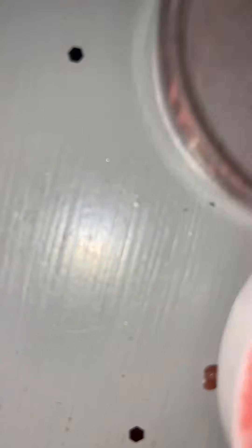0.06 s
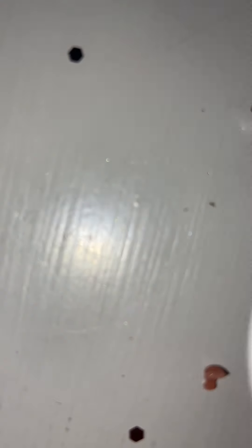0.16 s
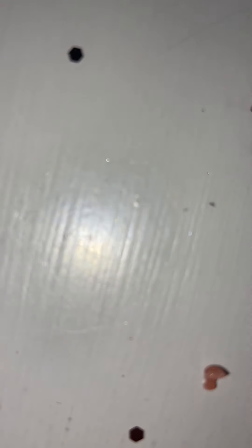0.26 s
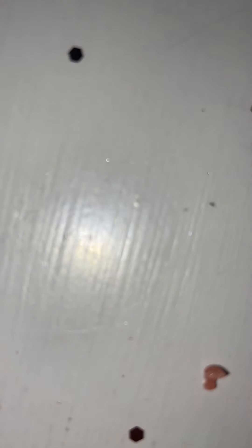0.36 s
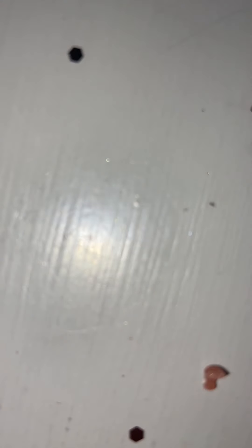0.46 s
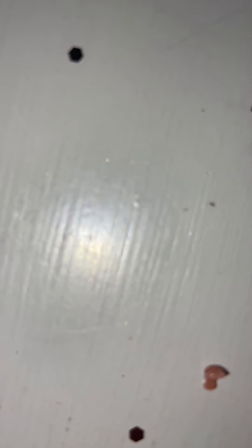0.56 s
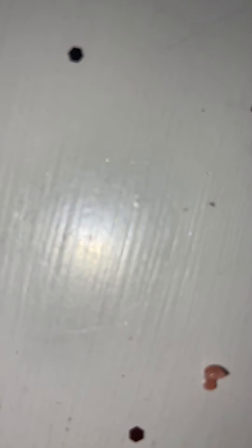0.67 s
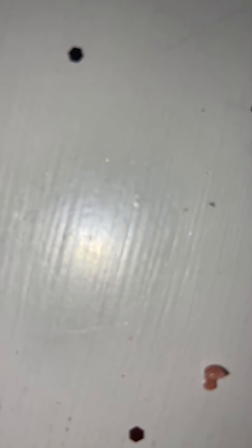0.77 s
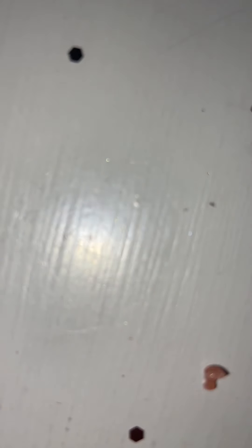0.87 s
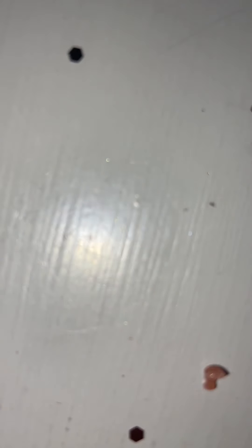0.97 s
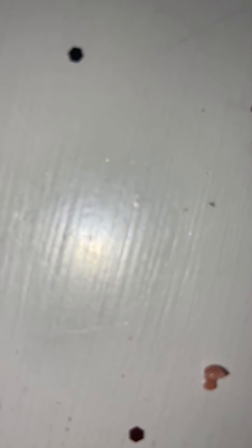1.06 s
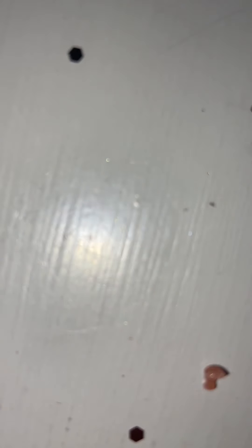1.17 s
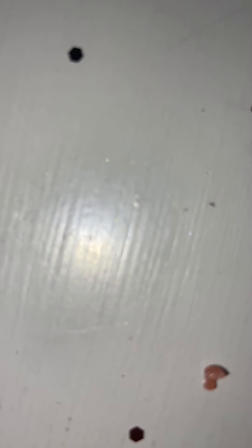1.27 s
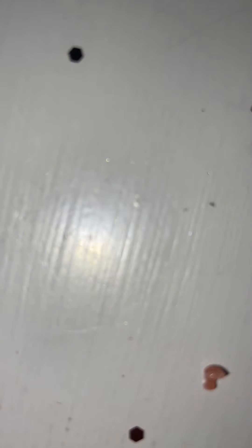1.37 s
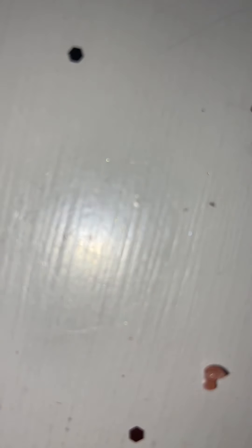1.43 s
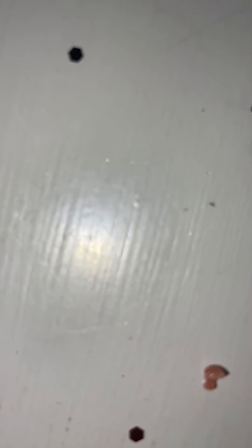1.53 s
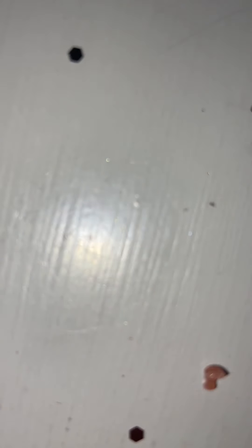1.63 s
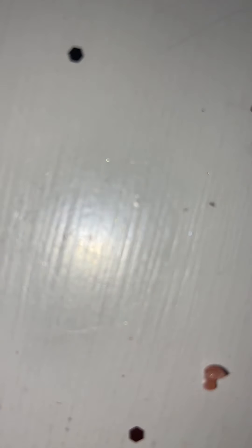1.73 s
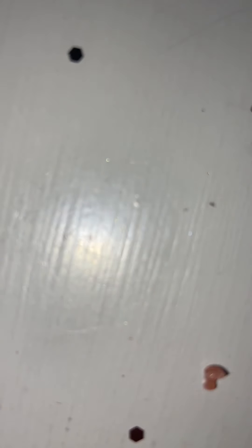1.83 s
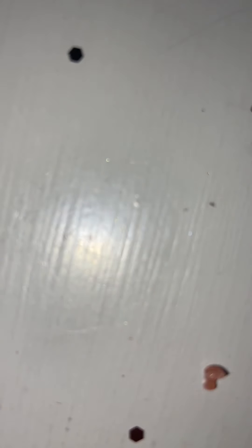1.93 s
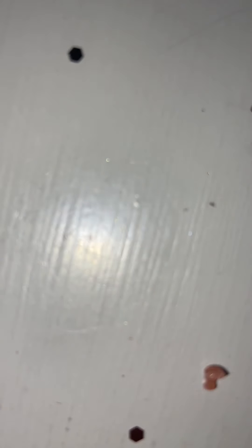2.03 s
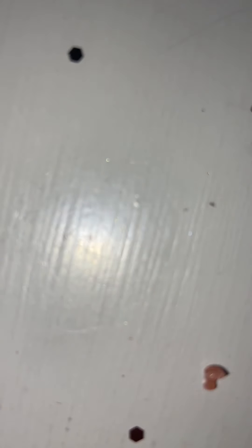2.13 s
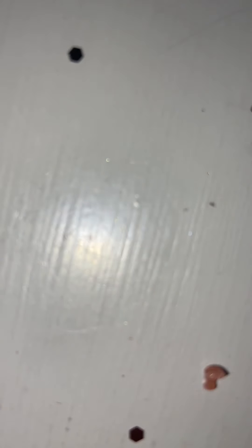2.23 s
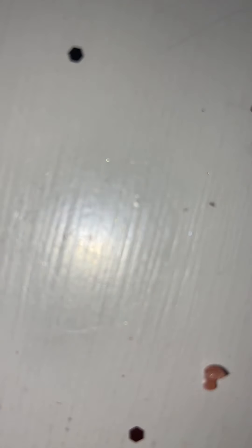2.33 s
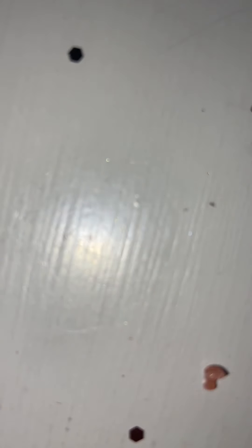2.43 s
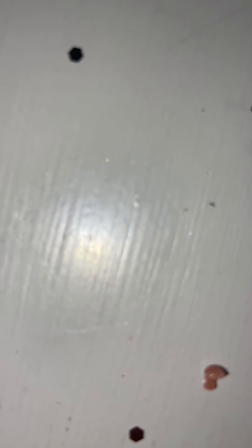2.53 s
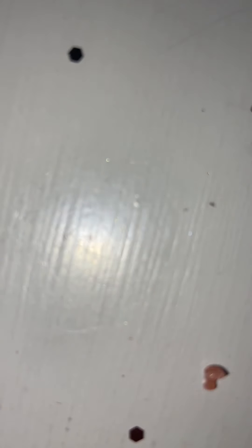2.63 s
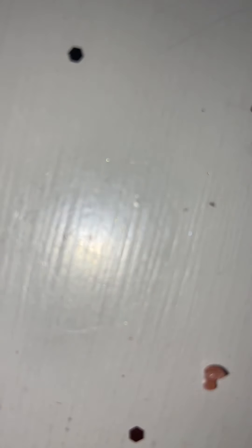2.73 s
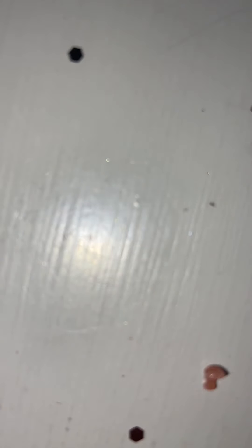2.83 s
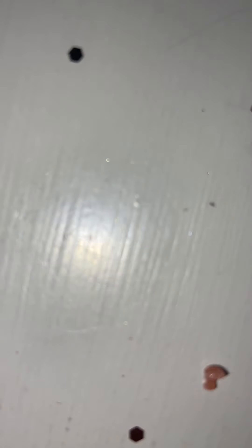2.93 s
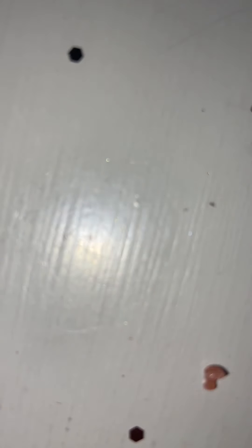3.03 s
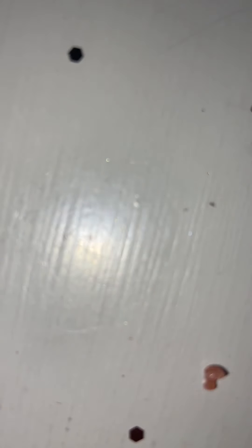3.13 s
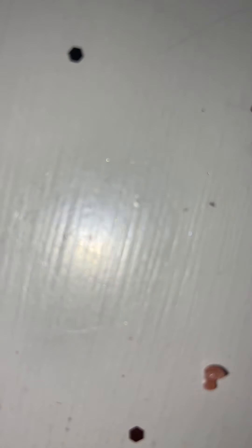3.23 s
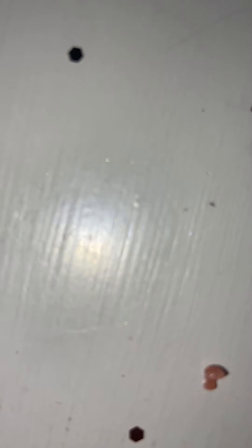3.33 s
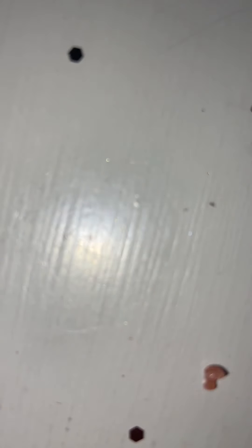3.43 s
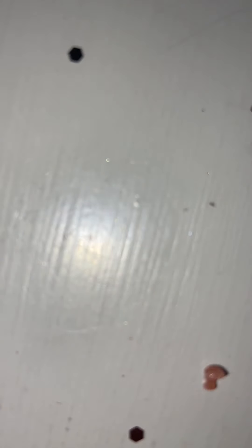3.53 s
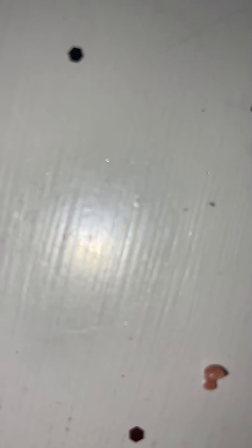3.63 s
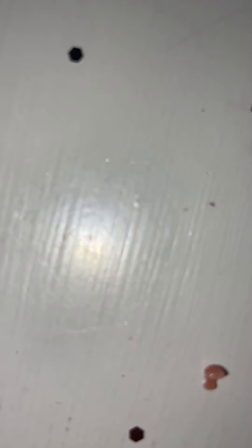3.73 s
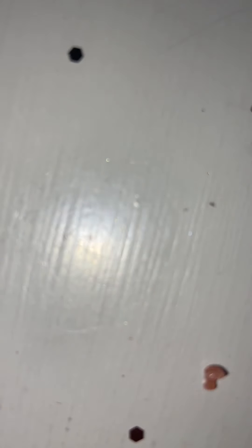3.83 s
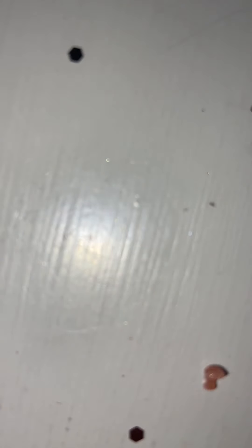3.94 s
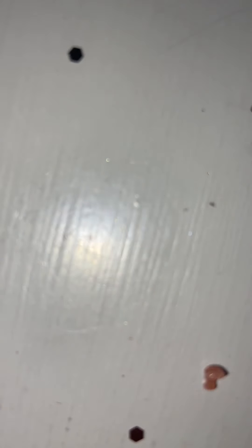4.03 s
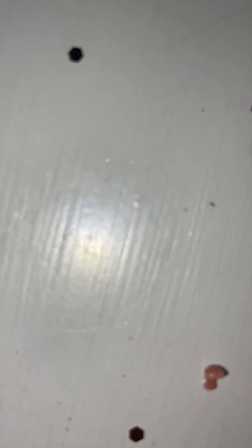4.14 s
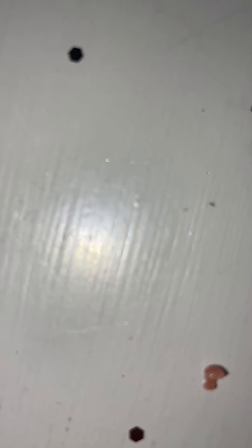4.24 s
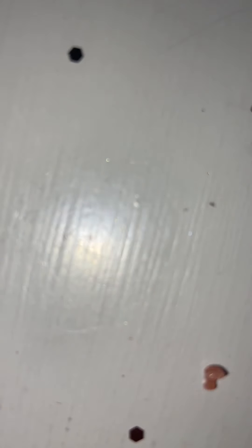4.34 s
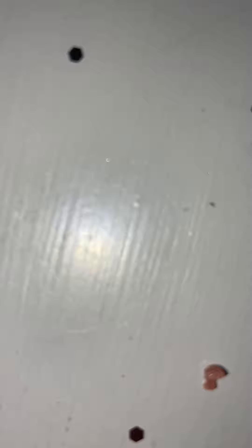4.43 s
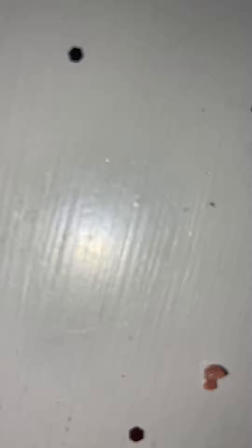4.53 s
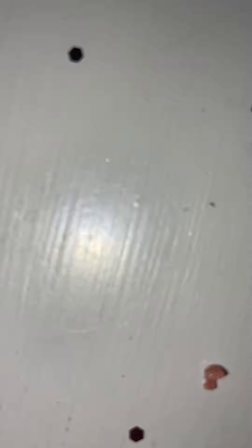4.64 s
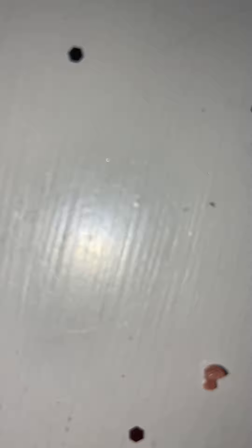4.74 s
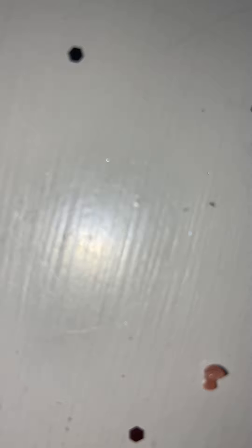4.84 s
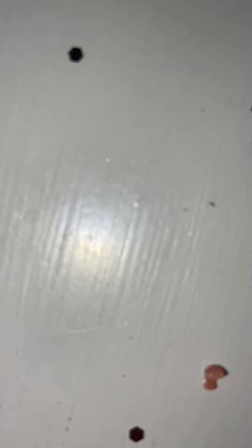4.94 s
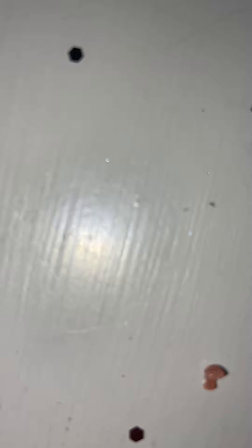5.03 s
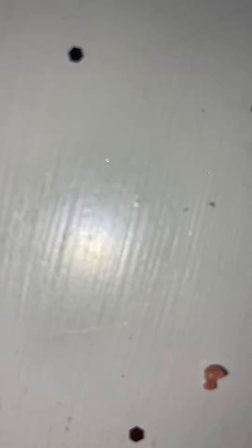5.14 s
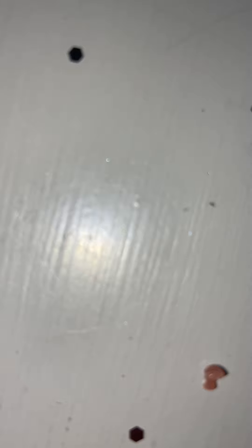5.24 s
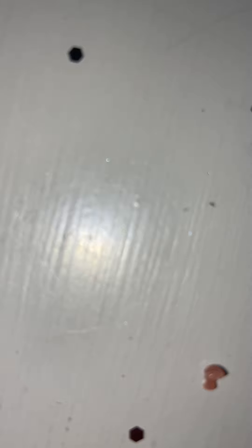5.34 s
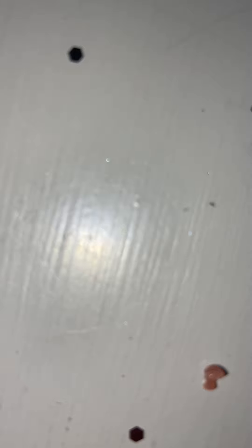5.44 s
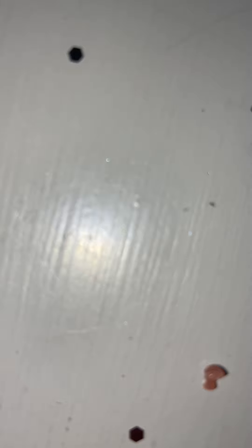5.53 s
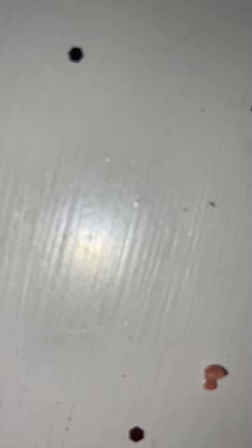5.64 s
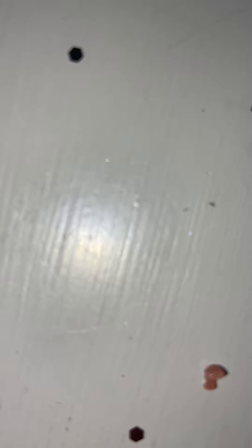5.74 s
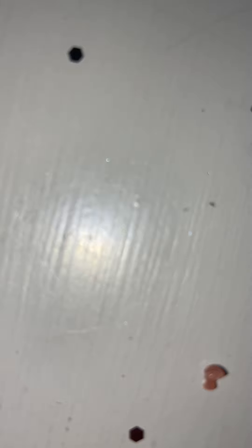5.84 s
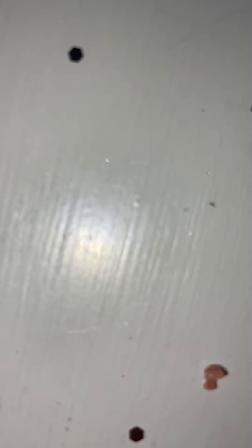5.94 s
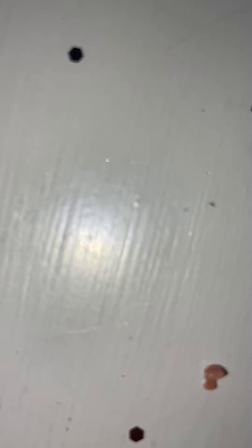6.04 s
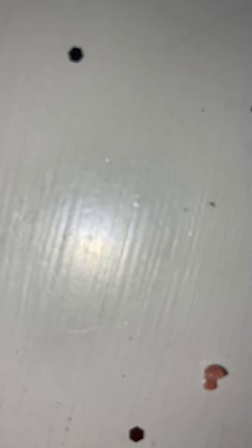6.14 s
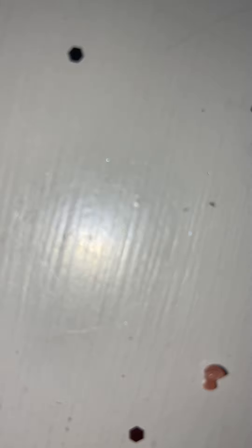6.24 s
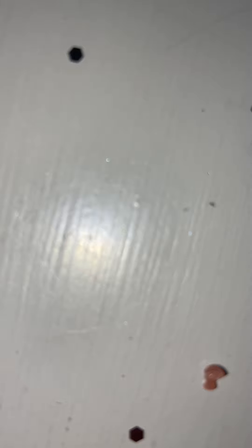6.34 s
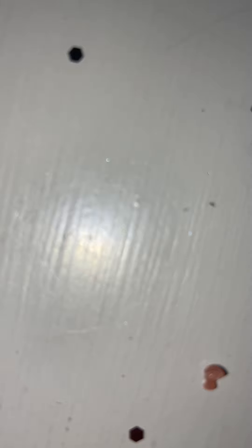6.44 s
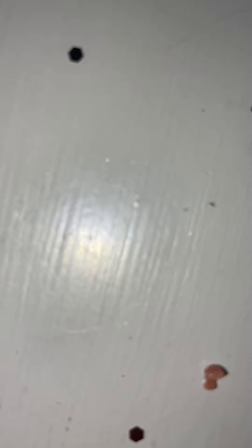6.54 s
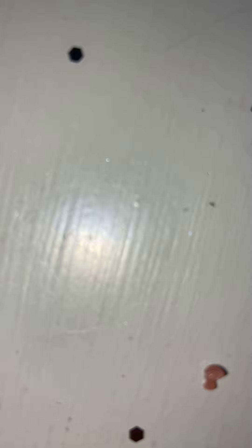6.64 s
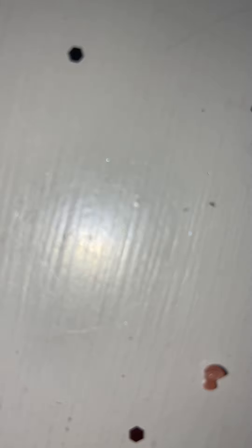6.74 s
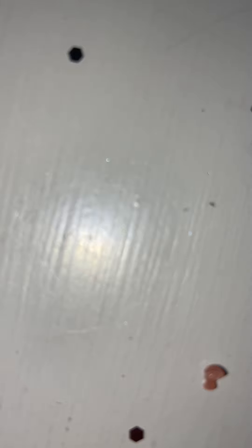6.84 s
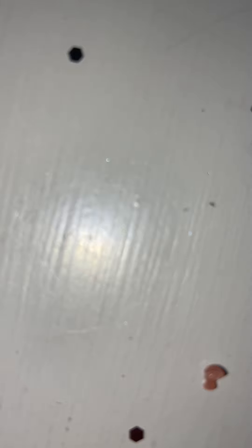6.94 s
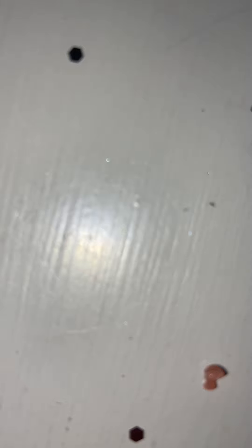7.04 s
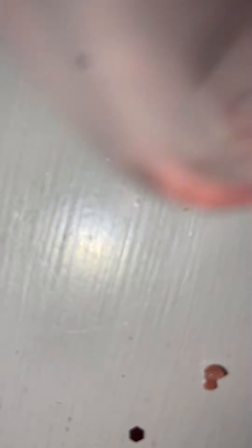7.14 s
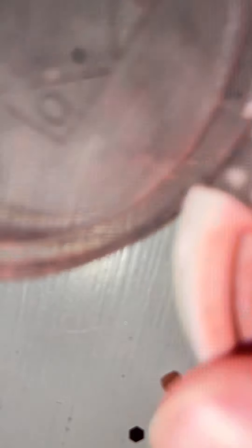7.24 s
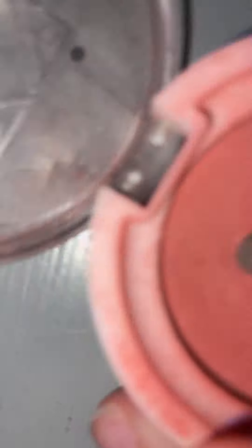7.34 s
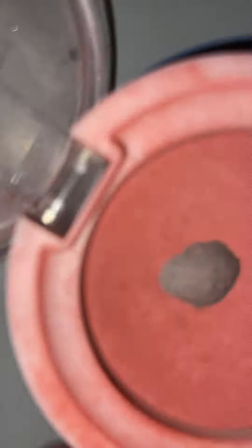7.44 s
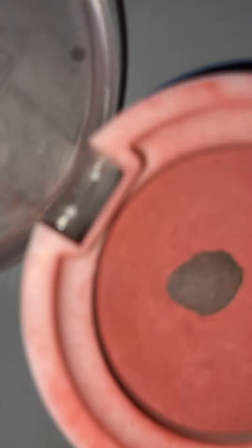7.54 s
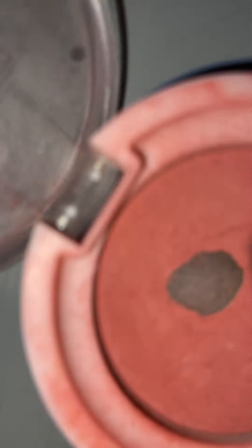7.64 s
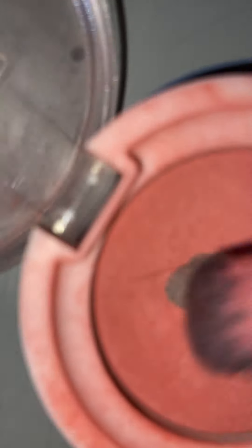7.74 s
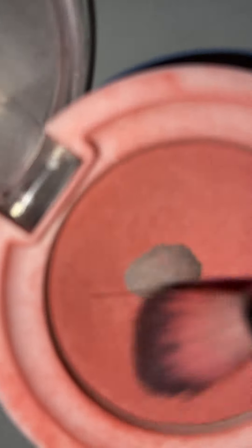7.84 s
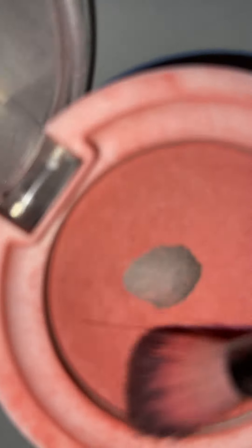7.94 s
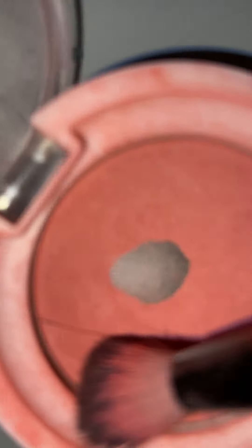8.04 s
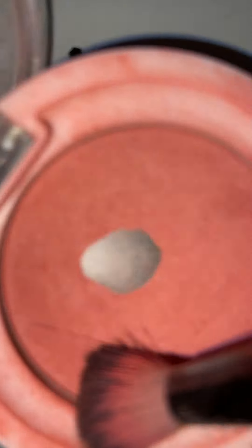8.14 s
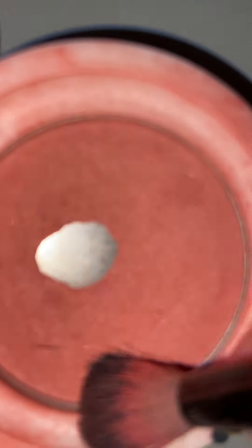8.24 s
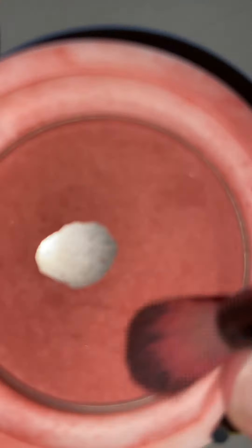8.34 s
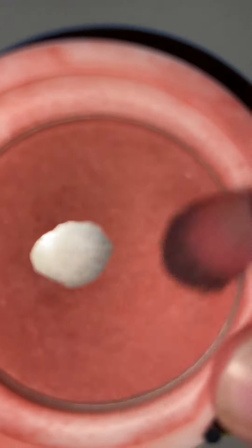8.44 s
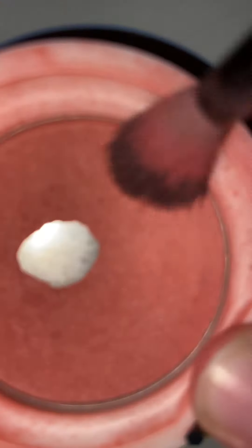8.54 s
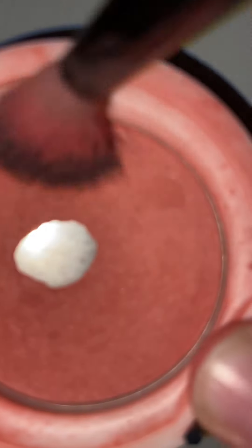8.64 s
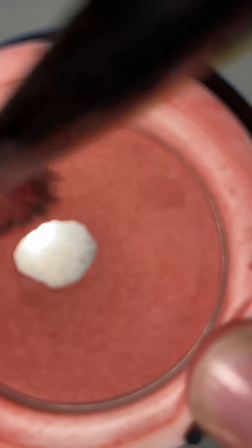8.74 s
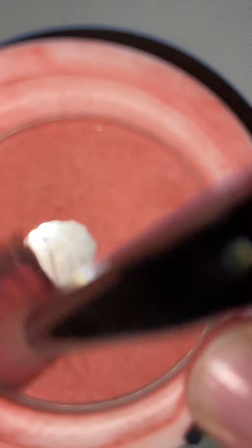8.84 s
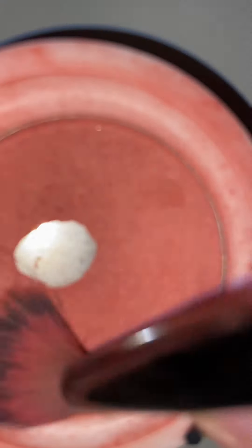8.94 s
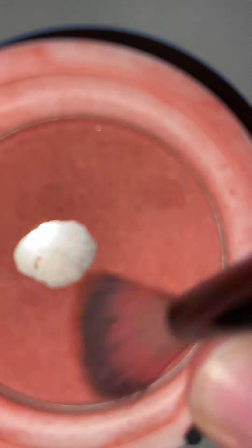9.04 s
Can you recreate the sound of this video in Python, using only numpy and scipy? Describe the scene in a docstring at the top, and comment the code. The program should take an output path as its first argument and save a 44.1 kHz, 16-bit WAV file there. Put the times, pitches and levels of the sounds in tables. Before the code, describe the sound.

Sharp plastic knock and slide, a dull hand thump, faint handle taps and scuffs, then a loud compact clatter and short scratchy brush strokes.

```python
"""A plastic makeup compact is pushed away over a table and later set down with a clatter: blows, ticks and
uneven slips excite the decaying modes of lid, shell, hollow and table. A brush is picked up with light taps
and later scratches over pressed powder, as coloured grit. A hand thumps the table, fingers scuff, a hinge
squeaks and a sleeve rustles. Behind is the quiet, low noise of a small room; a phone's two ports pick it up.
"""
import sys
import numpy as np
from scipy import signal
from scipy.fft import rfft, irfft, next_fast_len
from scipy.io import wavfile
from scipy.ndimage import map_coordinates

SR = 44100
rng = np.random.default_rng(int(sys.argv[2]) if len(sys.argv) > 2 else 0)


def unload_wav(signal):
    """Save mono or channel-first audio to the path in sys.argv[1] as 16-bit WAV at rate SR, clipped to [-1, 1]."""
    wavfile.write(
        sys.argv[1],
        SR,
        np.round(np.clip(np.atleast_2d(signal).T, -1, 1) * 32767).astype(np.int16),
    )


N = 400869
TIME_S = np.arange(N) / SR
BLOW_TIME_S = np.arange(SR // 4) / SR  # the life of one blow

# Modes of the table, its slap, the shell, the hollow and the rim. Each row: frequency in Hz, level in dB, t60 in s.
TABLE_MODES = [(295, -4.5, .08), (352, -0.5, 0.062), (424, -3, 0.034)]
SLAP_MODES = [(325.4, 7.5, 0.029), (403.3, 3.5, .07), (520, -5, 0.087), (687.8, -21, 0.036),
              (740, -4.5, 0.067), (1642.4, -7.5, 0.074)]
SHELL_MODES = [(1163, -2.5, 0.028), (1455, -3, 0.04), (1534, 1, 0.036), (1870, -6.5, .04),
               (2120, -11.5, 0.039), (2380, -8, 0.011), (2550, -6.5, 0.031), (2607, 1, 0.058),
               (3490, -2.5, 0.038), (3580, -7.5, 0.012), (4134, -9, 0.039), (4560, -5.5, 0.0099)]
HOLLOW_MODES = [(763.6, -6, 0.056), (841, 1.5, 0.039), (924, 0.5, 0.042), (1250, -13.5, 0.022)]
RIM_MODES = [(6630, -1.5, 0.0023), (8254, -4.5, 0.035), (9550, -3, .018), (10360, -1, 0.019),
             (10900, -5.5, 0.011), (14770, -5, 0.014)]
# Spectra of the dense modes of table, slap, case, shell, rim and hiss. Each row: frequency in Hz, level in dB per Hz.
TABLE_SPECTRUM = [(25, -46), (50, -23.5), (130, -11), (220, -9.5), (345, 3), (480, -5), (620, -12),
                  (1000, -15), (2200, -41)]
SLAP_SPECTRUM = [(120, -6.5), (400, 9.5), (750, -2), (1150, -10), (1900, -15), (3000, -29), (6000, -43.5),
                 (12000, -53)]
CASE_SPECTRUM = [(400, -18), (620, -11), (850, 4), (1050, 3.5), (1300, -10), (2000, -28)]
SHELL_SPECTRUM = [(500, -28), (1200, 2), (1900, -3.5), (2800, 4.5), (3500, -0.5), (4700, -6.5), (5600, -21),
                  (8000, -33)]
RIM_SPECTRUM = [(2500, -28.5), (5000, -8.5), (6800, -3.5), (10000, 3.5), (13000, -11), (14700, -1),
                (16300, -9.5)]
HISS_SPECTRUM = [(1000, -17.5), (2500, -4), (4300, 2), (6000, -3), (8000, 2), (10300, 1.5), (13000, -5.5),
                 (15000, 2.5), (16300, -5.5)]
# The lid's crowded lower and upper modes. Each row: frequency in Hz, level in dB per Hz.
LID_LOWER_SPECTRUM = [(1900, -30), (2450, -3), (2700, 0), (3050, 1.5), (3300, -15), (3900, -11.5),
                      (5000, -19.5), (7000, -36.5)]
LID_UPPER_SPECTRUM = [(4300, -34), (5250, -2), (5750, -0.5), (6050, -5), (6800, -30)]
# A brief contact. Each row: multiple of its centre frequency, level in dB per Hz.
SNAP_SPECTRUM = [(.3, -19), (.7, -7), (1, -0.5), (1.2, -5.5), (1.5, -25.5), (3, -50.5)]


def amp(db):
    """Decibels to gain."""
    return 10 ** (np.asarray(db) / 20)


def unit(x):
    """Scale to rms 1."""
    return x / np.sqrt(np.mean(x ** 2) + 1e-20)


def along(points, hz):
    """(Hz, value) points read on a log axis."""
    point_hz, value = np.transpose(points)
    return np.interp(np.log(hz + 1), np.log(point_hz + 1), value)


def wobble(knots_per_s):
    """A smooth curve through random knots."""
    knots = rng.standard_normal(int(N * knots_per_s / SR) + 4)
    return map_coordinates(knots, [TIME_S * knots_per_s])


def filtered(x, response):
    """x times a complex response of frequency."""
    n = x.shape[-1]
    padded = next_fast_len(n + SR // 8)
    spectrum = rfft(x, padded) * response(np.fft.rfftfreq(padded, 1 / SR))
    return irfft(spectrum, padded)[..., :n]


def coloured(x, spectrum):
    """x shaped by the given spectrum, at rms 1."""
    return unit(filtered(x, lambda hz: amp(along(spectrum, hz))))


def grit(slips_per_s, spread_db, smooth):
    """Tiny slips of random sign and uneven size over smooth friction noise, at rms 1."""
    happens = rng.random(N) < slips_per_s / SR
    sign = rng.choice([-1, 1], N)
    size = amp(spread_db * np.minimum(rng.standard_normal(N), 2))
    return unit(unit(happens * sign * size) + smooth * rng.standard_normal(N))


def ring(modes, scatter_db=2.0):
    """Damped modes, struck at new strengths and signs each time."""
    hz, db, t60_s = np.transpose(modes)[:, :, None]
    strength = amp(db + scatter_db * rng.standard_normal(hz.shape)) * rng.choice([-1, 1], hz.shape)
    decay = amp(-60 * BLOW_TIME_S / t60_s)
    return unit(np.sum(strength * decay * np.sin(2 * np.pi * hz * BLOW_TIME_S), axis=0))


def blow(modes, spectrum, t60_s, dense_db, contact_s=0.00031):
    """A body's answer: clear modes plus dense ones that die like noise, building up over the contact time."""
    noise = coloured(rng.standard_normal(len(BLOW_TIME_S)), spectrum)
    dense = unit(noise * amp(-60 * BLOW_TIME_S / t60_s))
    onset = 1 - np.exp(-BLOW_TIME_S / contact_s)
    return unit((ring(modes) + amp(dense_db) * dense) * onset)


def snap(hz, t60_s):
    """The dry click of a brief contact: decaying noise in a band around hz."""
    noise = coloured(rng.standard_normal(len(BLOW_TIME_S)), np.multiply(SNAP_SPECTRUM, [hz, 1]))
    return unit(noise * amp(-60 * BLOW_TIME_S / t60_s))


def add(track, start_s, db, sound):
    """Lay in a sound of rms 1; db is its energy as a level over 10 ms."""
    part = track[max(round(start_s * SR), 0):][:len(sound)]
    part += amp(db) * np.sqrt(.01 * SR / len(sound)) * sound[:len(part)]


def shake(track, start_s, thud_db, slap_db):
    """The table after weight lands on it: a slap, then the deep swing of the whole board."""
    # Each row: frequency in Hz, level in dB, t60 in s.
    deep_modes = [(60.38, -3, 0.091), (85.67, -6.5, 0.15), (106, -5.5, 0.17), (160.2, 0.5, 0.11),
                  (256, -7.5, 0.091)]
    # Each row: frequency in Hz, level in dB per Hz.
    deep_spectrum = [(25, -41), (40, -17.5), (60, -1), (170, 10), (300, -11.5), (700, -50)]
    track = track.copy()
    add(track, start_s + 0.003, thud_db, blow(deep_modes, deep_spectrum, t60_s=0.043, dense_db=-2, contact_s=0.0091))
    add(track, start_s, slap_db, blow(SLAP_MODES, SLAP_SPECTRUM, t60_s=0.091, dense_db=-1.5))
    return track


def through_table(x, delay_at_1khz_s=0.001812):
    """Bending waves travel slower the lower they are, and reach the two ports unequally."""
    # The low modes radiate to the left. Each row: frequency in Hz, left minus right in dB.
    lean = [(120, 0.5), (290, 6.5), (450, 4.5), (800, 1)]
    side = np.array([[.5], [-.5]])

    def response(hz):
        dispersion = np.exp(-4j * np.pi * delay_at_1khz_s * np.sqrt(1000 * hz))
        return amp(side * along(lean, hz)) * dispersion
    return filtered(x, response)


def rubbed(strokes, bodies, slips_per_s, spread_db, smooth, ease_db=4):
    """One track per body: uneven slips drive it at its own column of the strokes, easing off toward the end."""
    tracks = []
    for column, body in enumerate(bodies):
        pressure = np.zeros(N)
        for start_s, end_s, *dbs in strokes:
            corners_s = np.maximum.accumulate([start_s, start_s + 0.023, end_s - .015, end_s + 0.0067])
            shape = np.interp(TIME_S, corners_s, [0, amp(ease_db / 2), amp(-ease_db / 2), 0])
            pressure += amp(dbs[column]) * shape
        drive = pressure * grit(slips_per_s, spread_db, smooth)
        tracks.append(signal.fftconvolve(drive, body / np.linalg.norm(body))[:N])
    return tracks


def swells(moves):
    """Gain per sample: each move swells to its peak and dies away along a bell curve; powers add."""
    power = 0
    for peak_s, rise_s, fall_s, db in moves:
        width_s = np.where(TIME_S < peak_s, rise_s, fall_s)
        power = power + (amp(db) * np.exp(-((TIME_S - peak_s) / width_s) ** 2)) ** 2
    return np.sqrt(power)


def swishes(moves, slips_per_s):
    """Swelling moves of fine slips, each gathered in a band around its own pitch."""
    slips = amp(1.5 * wobble(40)) * grit(slips_per_s, spread_db=4, smooth=.6)
    return sum(swells([move]) * coloured(slips, np.multiply(SNAP_SPECTRUM, [hz, 1])) for *move, hz in moves)


def compact():
    """Each blow snaps, cracks the rim, clacks in shell and hollow, rings the lid and knocks the table.

    Hard blows favour the lid, soft ones the table."""
    # Each row: start in s, strength in dB, hardness in dB, shares of lid's edge, shell, hollow and snap in dB,
    # lid pitch in Hz.
    blow_rows = [(.018, -24, 10.5, 19, -7.5, 2, 2, 2921), (0.0354, -32.5, 9, -3.5, -7.5, 5, -1, 2923),
                 (.085, -34, -6, 14, -3, 4.5, -5.5, 2960), (.1618, -44, -6, 9, 2.5, 3.5, -9, 2805),
                 (0.1713, -53, -7, 8, -2, 3, -4, 3022), (0.1785, -46, -9.5, 11, 3, 3, -4.5, 2902),
                 (0.196, -50, -11, 0, 4, 6, -8, 3040), (0.2066, -49.5, -11, 12, 0.5, 6, -12, 2850),
                 (0.2237, -53.5, -15, 0, -2, 5, -8, 2950), (.231, -42.5, -4.5, -1, 3, 4.5, -6, 2748),
                 (.268, -50.5, -8, 5.5, -8, 2.5, -8, 2990), (0.417, -46.5, -9.5, 10, -3, -13, 2.5, 2930),
                 (0.5786, -42, -1.5, 25, -2.5, -3, -6.5, 2910),
                 (7.1262, -56, -11, 23.5, -1, -3, -5.5, 3032), (7.311, -18, 6, 18, -2, -0.5, -13, 2982),
                 (7.316, -27.5, 8, 1.5, 5.5, 0.5, -9.5, 2959), (7.377, -48, 0, 9, 0.5, 1, -9.5, 2990),
                 (7.413, -53.5, 2.5, 0, -1, 8, -22, 2950), (7.4875, -19.5, 2.5, -30.5, -1.5, 0, 0, 2990),
                 (7.5075, -24.5, 3.5, -1, 3, -1.5, -12.5, 2957), (7.524, -24, 4, 0.5, -1, 1.5, -11, 2981),
                 (7.540, -38, -1.5, -4, 3.5, 2, -13.5, 2975), (7.7784, -49.5, 7, 7.5, -10, -27, -6.5, 2880),
                 (7.7832, -35.5, 2.5, 1.5, -6, -8, -8, 2950), (7.812, -46.5, -1.5, -7, 3.5, -2, -20, 2860),
                 (7.8355, -44.5, -4, -12.5, -0.5, 4, -25, 2944), (8.1692, -31, 11, 2, 4, 4.5, -10.5, 2970),
                 (8.175, -41, 11.5, 7, -9, 7, -11, 2884), (8.1808, -41.5, 9, 7, 1, 13.5, -16, 2947),
                 (8.193, -42, 2.5, -5.5, -0.5, 10.5, -13, 2913), (8.4827, -38, 9, 10.5, 4.5, 9, -13, 2944)]
    # Each row: dB over the strength, dB per dB of hardness, dB per dB on the edge.
    to_parts = [(0, -1.1, 0),       # table
                (-2.8, -0.72, 0),   # hollow
                (0, -0.055, 0),     # shell
                (-2, 0.89, 0),      # lid
                (-21.5, 0, 0.94),   # lid's overtone
                (-4.5, 0, .2)]      # rim
    thud_over_db, slap_over_db = -12.5, -11.5  # a blow also shakes the whole board
    snap_hz, crack_db_per_snap_db = 4700, 0.71
    lid_second_hz = 2760  # quickly damped
    case, board, deep = np.zeros((3, N))
    for start_s, db, hardness_db, edge_db, shell_db, cavity_db, snap_db, lid_hz in blow_rows:
        part_dbs = db + np.dot(to_parts, [1, hardness_db, edge_db])
        knock_db, hollow_db, clack_db, lid_db, overtone_db, crack_db = part_dbs
        add(board, start_s, knock_db, blow(TABLE_MODES, TABLE_SPECTRUM, t60_s=0.056, dense_db=-1.5))
        hollow = blow(HOLLOW_MODES, CASE_SPECTRUM, t60_s=0.067, dense_db=-5.5)
        add(case, start_s + .0015, hollow_db + cavity_db, hollow)
        add(case, start_s, clack_db + shell_db, blow(SHELL_MODES, SHELL_SPECTRUM, t60_s=0.025, dense_db=-1))
        add(case, start_s, db + snap_db, snap(snap_hz, t60_s=0.0046))
        add(case, start_s, lid_db, ring([(lid_hz, 0, .058), (lid_second_hz, -6, .022)], scatter_db=3.5))
        overtone = blow([(1.907 * lid_hz, 0, .062)], LID_UPPER_SPECTRUM, t60_s=0.021, dense_db=-6.5, contact_s=.0004)
        add(case, start_s, overtone_db, overtone)
        crack = blow(RIM_MODES, RIM_SPECTRUM, t60_s=0.0089, dense_db=4.5)
        add(case, start_s, crack_db + crack_db_per_snap_db * snap_db, crack)
        deep = shake(deep, start_s + .002, db + thud_over_db, db + slap_over_db)
    return case + through_table(board) + deep


def scrapes():
    """The sliding compact drives table, shell, lid and rim with slips; the board rumbles under the drag."""
    # Each row: start in s, end in s, strength in dB, shares of weight on the table, lid and hiss in dB.
    drag_rows = [(0.044, 0.143, -57.5, 9, 3, -10), (0.161, 0.261, -53, 21, -1, -8.5),
                 (0.257, 0.287, -62, 17.5, -5, -1), (0.419, 0.473, -70.5, 25.5, -2, -4),
                 (6.861, 6.972, -76.5, 9, -3, 7), (7.135, 7.305, -88.5, 5.5, 0, 9.5),
                 (7.343, 7.43, -55, 4, -2, -4.5), (7.431, 7.482, -69.5, 10, 3, -6),
                 (7.554, 7.664, -67.5, 9.5, 2.5, -1), (7.652, 7.715, -83, 10, 1, 2),
                 (7.702, 7.786, -71, 7, 4, -2), (7.776, 7.856, -54.5, 8, 2.5, -3.5),
                 (7.85, 8.036, -81, 19, 6, -3), (8.043, 8.088, -54.5, 8.5, 7, 1),
                 (8.093, 8.183, -69.5, 6.5, 6, 2), (8.181, 8.228, -58, 7, -3, 5.5)]
    # Each row: frequency in Hz, level in dB per Hz.
    rumble_spectrum = [(25, -33), (55, -10), (85, -1), (120, 0), (160, -14), (300, -26), (800, -42.5)]
    squeak_over_db, rumble_over_db = -16, 7  # over a scrape's strength
    board = blow(TABLE_MODES, TABLE_SPECTRUM, t60_s=0.054, dense_db=-0.5)
    board = board + 0.76 * blow(HOLLOW_MODES, CASE_SPECTRUM, t60_s=0.049, dense_db=-4)
    shell = blow(SHELL_MODES, SHELL_SPECTRUM, t60_s=.012, dense_db=1.5)
    lid = blow([(2950, 0, .04)], LID_LOWER_SPECTRUM, t60_s=.014, dense_db=-5)
    edge = blow([(5662, 0, .027)], LID_UPPER_SPECTRUM, t60_s=.012, dense_db=3)
    rim = blow(RIM_MODES, HISS_SPECTRUM, t60_s=.0028, dense_db=11)
    deep = coloured(rng.standard_normal(len(BLOW_TIME_S)), rumble_spectrum) * amp(-60 * BLOW_TIME_S / 0.11)
    drags = []
    for start_s, end_s, db, weight_db, lid_db, hiss_db in drag_rows:
        shares_db = np.array([weight_db, 0, lid_db, squeak_over_db, hiss_db, rumble_over_db])
        drags.append((start_s, end_s, *(db + shares_db)))
    bodies = [board, shell, lid, edge, rim, deep]
    table, *parts = rubbed(drags, bodies, slips_per_s=380, spread_db=4, smooth=.6)
    return through_table(table) + sum(parts)


def ticks():
    """Hand and brush nudge the compact; its loose lid gives a short ring, a dry click and a crack at the rim."""
    # Each row: start in s, strength in dB, lid pitch in Hz, crack at the rim in dB over strength.
    tick_rows = [(7.302, -53, 2950, -14), (7.448, -61, 2900, -18), (7.479, -49, 2900, -17),
                 (7.5603, -51.5, 2950, -3.5), (7.594, -57, 2900, -12), (7.6348, -60.5, 2920, -4),
                 (7.699, -58.5, 2830, -8), (7.726, -56.5, 2950, -4), (7.733, -59, 2600, -8),
                 (7.877, -60, 2550, -18), (7.884, -55.5, 2940, -6), (7.909, -63, 2700, -5),
                 (7.9203, -58, 2680, -11), (7.945, -53.5, 2690, -7), (7.954, -52, 2910, -3),
                 (8.009, -57, 2800, -14), (8.0492, -60.5, 2900, -6), (8.2654, -58.5, 2850, -4),
                 (8.3426, -53, 2900, -4), (9.083, -48.5, 2870, -4)]
    click_hz, click_spread, click_db = 3900, .13, -7.5  # centre, relative scatter, dB over strength
    lid = np.zeros(N)
    for start_s, db, lid_hz, crack_db in tick_rows:
        add(lid, start_s, db, blow([(lid_hz, 0, .028)], LID_LOWER_SPECTRUM, t60_s=.017, dense_db=2))
        this_click_hz = click_hz * np.exp(click_spread * rng.standard_normal())
        add(lid, start_s, db + click_db, snap(this_click_hz, t60_s=.007))
        add(lid, start_s, db + crack_db, blow(RIM_MODES, RIM_SPECTRUM, t60_s=.005, dense_db=4))
    return lid


def squeaks():
    """The turning hinge slips finely and excites an upper mode of the lid and the crowded modes around it."""
    # Each row: peak in s, rise in s, fall in s, level in dB, pitch in Hz, crowded modes over the tone in dB.
    squeak_rows = [(0.584, 0.013, 0.024, -45.5, 5630, 3), (.63, 0.027, 0.033, -62.5, 5450, 2),
                   (1.124, 0.055, 0.056, -76.5, 5740, -11), (1.32, 0.042, 0.04, -70, 5840, 3),
                   (7.21, .09, 0.087, -81, 3010, -20.5)]
    # Each row: frequency in Hz, level in dB per Hz.
    hinge_spectrum = [(1500, -3.5), (2400, -4), (2950, 8), (3500, -5), (4500, -6), (5700, -26), (7000, -7),
                      (10000, -3), (13000, -20), (15000, -13)]
    friction_db = -3.5  # dry friction under the squeak
    slips = grit(slips_per_s=640, spread_db=2, smooth=0.47)
    sound = amp(friction_db) * swells([row[:4] for row in squeak_rows]) * coloured(slips, hinge_spectrum)
    crowd = coloured(slips, LID_UPPER_SPECTRUM)
    for *turn, hz, crowd_db in squeak_rows:
        tone = unit(signal.fftconvolve(slips, ring([(hz, 0, .035)]))[:N])
        sound += swells([turn]) * unit(tone + amp(crowd_db) * crowd)
    return sound


def brush():
    """Bristle tips catch on the powder and excite the pan; each stroke swishes at its own pitch."""
    # Each row: peak in s, rise in s, fall in s, level in dB, centre of the swish in Hz, swish over level in dB.
    stroke_rows = [(8.1, 0.16, 0.28, -68, 4000, -7), (8.37, 0.064, 0.063, -61.5, 4950, -8),
                   (8.48, 0.039, .06, -57.5, 4660, -7), (8.61, 0.068, 0.088, -59.5, 4800, -6.5),
                   (8.73, 0.089, 0.11, -60, 4600, -7), (8.9, 0.058, 0.054, -65.5, 5000, -4.5),
                   (9.07, 0.072, .1, -56, 4750, -4.5)]
    # Each row: frequency in Hz, level in dB per Hz.
    bristle_spectrum = [(250, 5.5), (550, -1.5), (800, 8.5), (1100, -4), (1700, -8), (2450, -17),
                        (2950, 9.5), (3500, -3), (4600, 1.5), (5600, -13), (7000, -10), (10500, 3),
                        (13200, -3), (15000, -2), (16200, -2)]
    pressure = swells([row[:4] for row in stroke_rows]) * amp(1.4 * wobble(30))
    pan = pressure * coloured(grit(slips_per_s=4500, spread_db=6.5, smooth=0.99), bristle_spectrum)
    moves = [(peak_s, rise_s, fall_s, db + share_db, hz)
             for peak_s, rise_s, fall_s, db, hz, share_db in stroke_rows]
    return pan + swishes(moves, slips_per_s=1500)


def taps():
    """Brush handle and fingertips touch the table lightly; a harder tap knocks less and cracks more."""
    # Each row: start in s, strength in dB, hardness in dB, ring of the handle in dB, click pitch in Hz.
    tap_rows = [(.509, -66, 3.5, -1, 2900), (.662, -67.5, -2.5, -2, 2300), (.678, -69, -7.5, 2, 914),
                (.803, -66.5, -7, 3, 2320), (3.6671, -64, 8.5, -5, 3975), (3.745, -55, 9.5, -3.5, 4000),
                (3.7746, -70, 9, -8, 5200), (3.7995, -69, 9, -8, 3500), (3.8462, -72, 6, -8, 3320),
                (3.8868, -69, 8, -8, 4200), (3.9467, -75, 8, -13, 3300), (4.054, -69.5, 13.5, -10.5, 6040),
                (4.239, -64, 14, -1, 3970), (4.2696, -61, -7, -3.5, 3600), (4.338, -66.5, 7, -2, 3770),
                (4.421, -52, -1, 5, 2140), (4.4662, -47, 6.5, 5, 3470), (4.6035, -60, 3, -2, 2350),
                (4.7003, -73.5, -1.5, -12.5, 2660), (4.7552, -63.5, 4, -2, 4000),
                (5.562, -75, 26.5, -8.5, 5000), (6.114, -81.5, 25.5, -6, 4920),
                (6.3596, -69, 7.5, -6.5, 3490)]
    # Each row: frequency in Hz, level in dB, t60 in s.
    handle_modes = [(1358, -2.5, 0.081), (1545, 5, 0.075), (1646, 3.5, 0.059), (2400, -12, .025),
                    (3330, -2, .02), (4600, -6.5, 0.037)]
    knock_over_db, crack_over_db = 12, -12.5  # at hardness 0
    handle, board = np.zeros((2, N))
    for start_s, db, hardness_db, ring_db, click_hz in tap_rows:
        knock = blow(TABLE_MODES, TABLE_SPECTRUM, t60_s=0.072, dense_db=3)
        add(board, start_s, db + knock_over_db - hardness_db, knock)
        add(handle, start_s, db + ring_db, blow(handle_modes, SHELL_SPECTRUM, t60_s=0.071, dense_db=-20))
        add(handle, start_s, db, snap(click_hz, t60_s=0.0085))
        crack = blow(RIM_MODES, RIM_SPECTRUM, t60_s=0.0041, dense_db=17)
        add(handle, start_s, db + crack_over_db + hardness_db, crack)
    return handle + through_table(board)


def bumps():
    """The hand lands on the table; softer bumps of arm and set-down compact have little treble."""
    # Fingers first, then palm and heel. Each row: start in s, thud in dB, slap in dB.
    hand_rows = [(1.535, -34, -33.5), (1.542, -28.5, -26.5), (1.553, -27.5, -43), (1.567, -31.5, -42.5)]
    # Each row: start in s, thud in dB, slap over thud in dB.
    soft_bump_rows = [(0.581, -35.5, -12), (.822, -44.5, -9), (1.736, -42, -9), (1.797, -48.5, -5),
                      (1.877, -44, -2.5), (1.924, -45.5, -6), (1.945, -51, -7), (2, -51.5, 0),
                      (2.037, -60, -4), (2.303, -41, -8), (2.447, -47, -6.5), (3.669, -48, -14),
                      (7.515, -35, -10)]
    soft_hz = 1390
    hand, soft = np.zeros((2, N))
    for start_s, thud_db, slap_db in hand_rows:
        hand = shake(hand, start_s, thud_db, slap_db)
    for start_s, thud_db, slap_over_db in soft_bump_rows:
        soft = shake(soft, start_s, thud_db, thud_db + slap_over_db)
    return hand + filtered(soft, lambda hz: 1 / (1 + (hz / soft_hz) ** 4))


def scuffs():
    """Dry skin catches in coarse grains on handle and table; pressure moves the sound from hiss into the table."""
    # Each row: start in s, end in s, strength in dB, pressure in dB.
    scuff_rows = [(0.768, 0.853, -69, 3), (3.658, 3.718, -72.5, -9.5), (3.748, 3.871, -70, 3),
                  (3.85, 3.968, -78.5, -12.5), (3.985, 4.083, -75, -6), (4.271, 4.405, -69, 4.5),
                  (4.395, 4.514, -61.5, 0.5), (4.502, 4.576, -69, 1), (5.275, 5.323, -83.5, -8),
                  (5.538, 5.638, -84.5, -6.5), (6.339, 6.46, -83, -4.5), (6.858, 6.98, -77, -5)]
    # The handle, damped by the fingers. Each row: frequency in Hz, level in dB, t60 in s.
    grip_modes = [(1350, 1, .026), (1610, 0, .026), (3220, 2, .02)]
    # Each row: frequency in Hz, level in dB per Hz.
    skin_spectrum = [(400, -4), (900, 3), (1500, 5), (2100, 4.5), (2700, -8), (3200, 1), (4400, -2),
                     (6000, -4), (8000, -13)]
    table_over_db = 11
    bodies = [blow(TABLE_MODES, TABLE_SPECTRUM, t60_s=0.05, dense_db=-8),
              blow(grip_modes, skin_spectrum, t60_s=0.0078, dense_db=5.0),
              blow(RIM_MODES, HISS_SPECTRUM, t60_s=0.0029, dense_db=47.0)]
    rubs = [(start_s, end_s, db + table_over_db + pressure_db, db, db - pressure_db)
            for start_s, end_s, db, pressure_db in scuff_rows]
    board, handle, hiss = rubbed(rubs, bodies, slips_per_s=240, spread_db=5.0, smooth=0.45)
    return amp(1.1 * wobble(45)) * (through_table(board) + handle + hiss)


def sleeve():
    """Cloth swishes with the arm's moves; the forearm rubs dully on the table and catches in an uneven crackle."""
    # Moves of the sleeve, slides of the forearm. Each row: peak in s, rise in s, fall in s, level in dB.
    sleeve_rows = [(0, .1, 0.13, -52.5), (.5, 0.32, 0.25, -67), (1.92, 0.27, 0.27, -65.5),
                   (2.2, .09, 0.23, -70), (3.05, 0.2, 0.36, -71.5), (4.2, 0.93, 0.95, -85.5),
                   (7.3, 0.92, 0.44, -86)]
    forearm_rows = [(1.59, .02, 0.1, -58.5), (1.95, 0.2, 0.38, -58.5)]
    # Each row: frequency in Hz, level in dB per Hz.
    cloth_spectrum = [(200, -5.5), (700, 6.5), (1500, 3), (2400, -3), (3500, 5), (6000, 2), (10000, 0.5),
                      (13000, -2), (16000, -5)]
    rubbing_spectrum = [(35, -10), (80, 5), (180, -7), (400, -0.5), (600, -12.5), (1100, -12), (2200, -22),
                        (6000, -41)]
    crackle_over_rub_db = -8.5
    cloth = coloured(grit(slips_per_s=1800, spread_db=6.0, smooth=2.2), cloth_spectrum)
    swish = swells(sleeve_rows) * amp(0.89 * wobble(32)) * cloth
    rubbing = coloured(grit(slips_per_s=680, spread_db=7.5, smooth=2.0), rubbing_spectrum)
    rub = amp(4.6 * wobble(29.65)) * rubbing
    catches = grit(slips_per_s=260, spread_db=4, smooth=.3)
    slap = blow(SLAP_MODES, SLAP_SPECTRUM, t60_s=0.017, dense_db=6)
    crackle = unit(signal.fftconvolve(catches, slap)[:N])
    return swish + swells(forearm_rows) * (rub + amp(crackle_over_rub_db) * crackle)


def rustles():
    """Faint, narrow bands of fine slips swell and die."""
    # Each row: peak in s, rise in s, fall in s, level in dB, centre in Hz.
    rustle_rows = [(3.68, .012, .025, -65, 5200), (4.012, 0.016, 0.019, -66, 2800),
                   (5.3, .02, 0.024, -74, 4200), (5.58, .09, 0.046, -78.5, 4400),
                   (6.41, .04, .05, -84, 2000), (6.92, 0.048, 0.051, -69.5, 6230),
                   (7.23, 0.077, 0.087, -73, 10500)]
    return swishes(rustle_rows, slips_per_s=700)


def room(x):
    """A short diffuse tail of decaying noise, different at each port; high bands die sooner."""
    # Each row: frequency in Hz, t60 in s.
    decay_rows = [(150, 0.27), (1000, 0.1), (4000, 0.059), (14000, 0.052)]
    hz, tail_s, bins = signal.stft(rng.standard_normal((2, SR // 2)), SR, nperseg=256)
    decay = amp(-60 * tail_s / along(decay_rows, hz)[:, None])
    tail = signal.istft(bins * decay, SR, nperseg=256)[1]
    tail *= 1 - np.exp(-np.arange(tail.shape[1]) / SR / .006)  # builds up over 6 ms
    return signal.fftconvolve(x, tail / np.linalg.norm(tail[0]), axes=1)[:, :N]


def hum():
    """The low, slightly restless background of the room, as coloured noise."""
    # Each row: frequency in Hz, level in dB per Hz.
    hum_spectrum = [(20, -10.5), (35, -11.5), (55, 1.5), (100, -1), (170, -4.5), (260, -7.5), (400, -14.5),
                    (600, -24), (900, -25.5), (1300, -39.5), (2500, -44), (5000, -50), (10000, -51),
                    (16000, -56.5)]
    return amp(-57.5 + 0.88 * wobble(3.5)) * coloured(rng.standard_normal(N), hum_spectrum)


def scene():
    """All sources, with the level and phase differences between the two ports."""
    # Each row: frequency in Hz, left minus right in dB.
    port_level = [(100, -0.5), (350, -3), (800, -2), (1200, -2), (2000, 0), (2950, -3), (3500, 0),
                  (4500, -2.5), (5500, 0)]
    # Each row: frequency in Hz, lead of the left in radians.
    port_phase = [(20, 0), (130, -0.2), (300, -.7), (540, -1), (750, 1.12), (1080, 0.82), (1800, 0.5),
                  (2700, 1.15), (4300, 0.8), (5100, 1.15), (5800, 1.13), (6700, 2), (8000, 3.5), (9400, 6),
                  (11200, 6.5), (12800, 9), (14000, 10.5), (16000, 10.5)]
    room_db = -19.0
    contacts = compact() + ticks() + taps() + bumps() + scrapes() + squeaks() + scuffs()
    air = contacts + amp(room_db) * room(contacts) + sleeve() + rustles() + brush() + hum()
    side = np.array([[.5], [-.5]])

    def response(hz):
        return amp(side * along(port_level, hz)) * np.exp(1j * side * along(port_phase, hz))
    return filtered(air, response)


def record(dry):
    """The phone rounds off the highest peaks and cuts steeply outside its band."""
    peak_limit, low_cut_hz, top_hz = .85, 33, 16350
    rounded = dry / (1 + np.abs(dry / peak_limit) ** 6) ** (1 / 6)

    def band(hz):
        return hz ** 6 / (hz ** 6 + low_cut_hz ** 6) / (1 + (hz / top_hz) ** 120)
    return filtered(rounded, band)


dry = scene()
out = record(dry)
unload_wav(out)
```